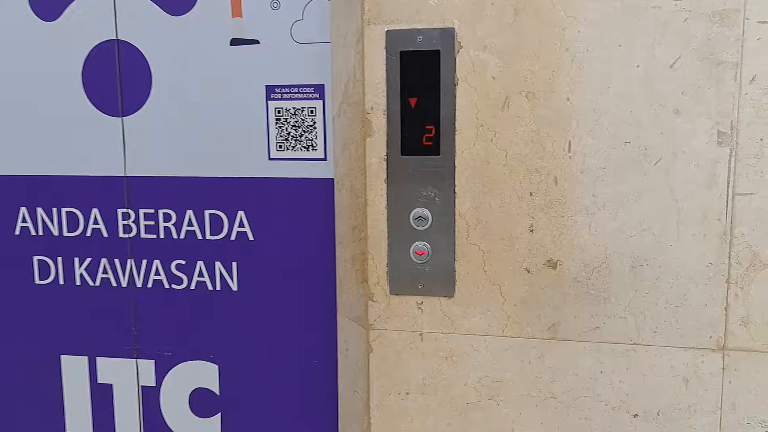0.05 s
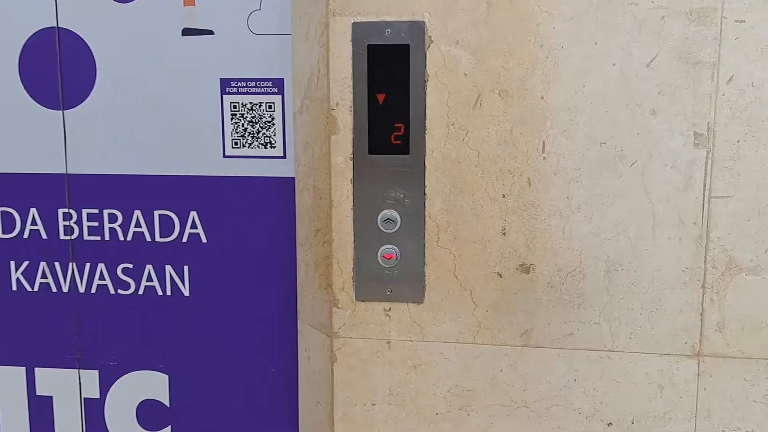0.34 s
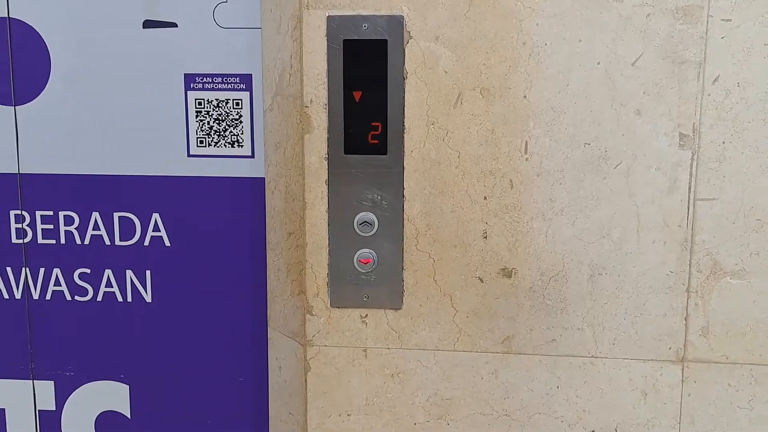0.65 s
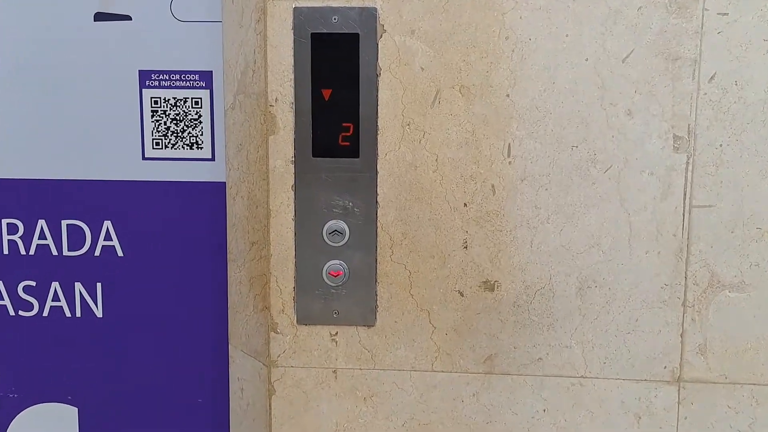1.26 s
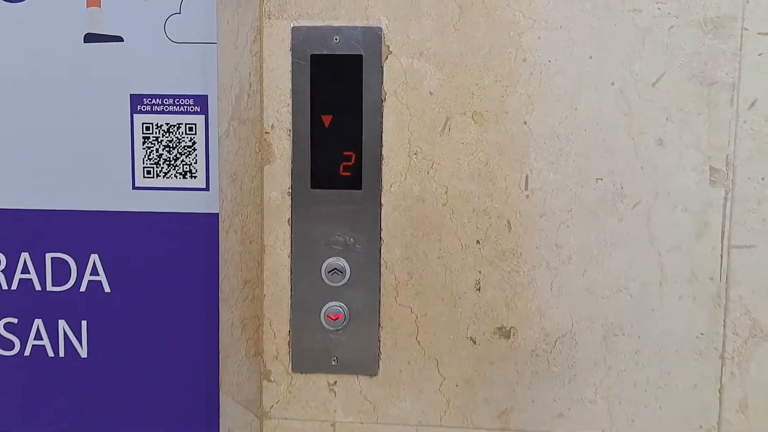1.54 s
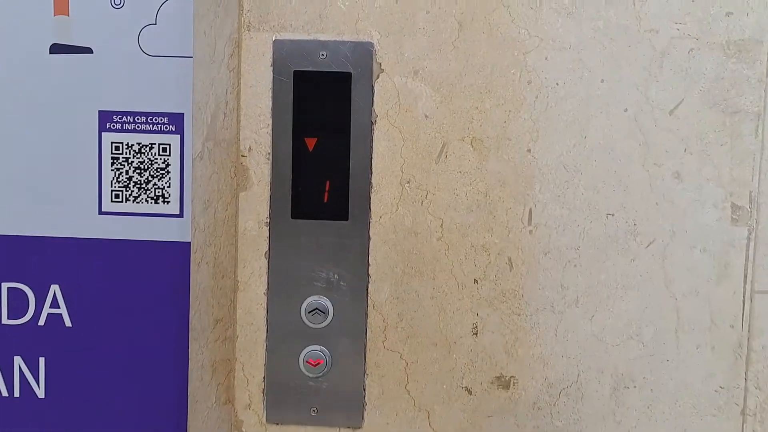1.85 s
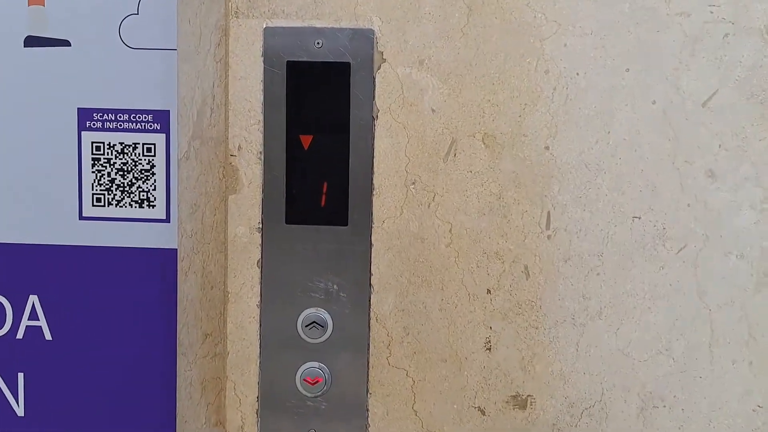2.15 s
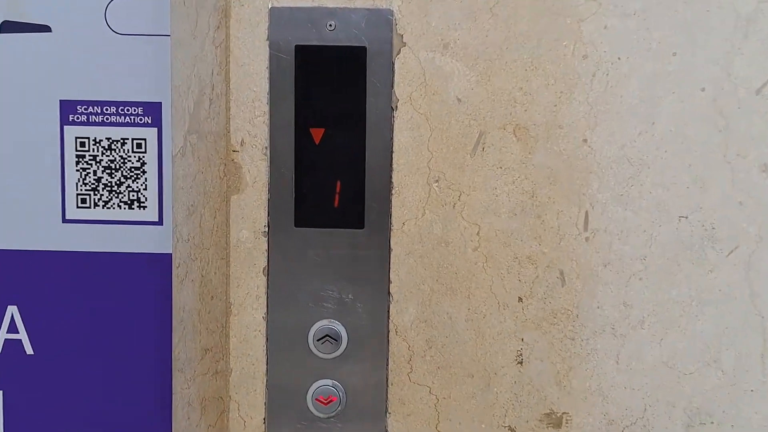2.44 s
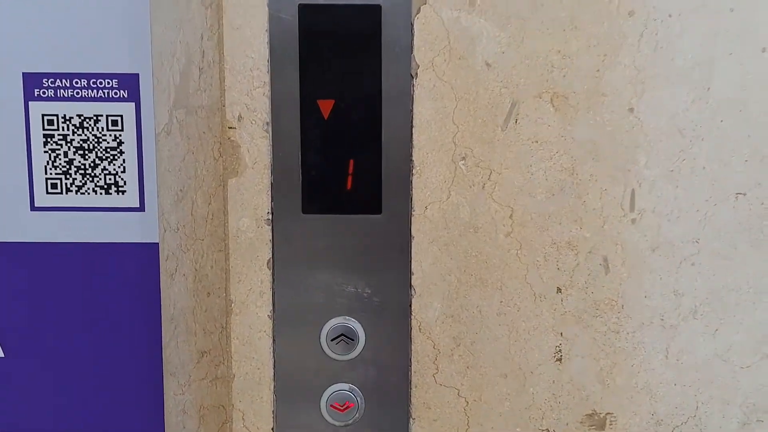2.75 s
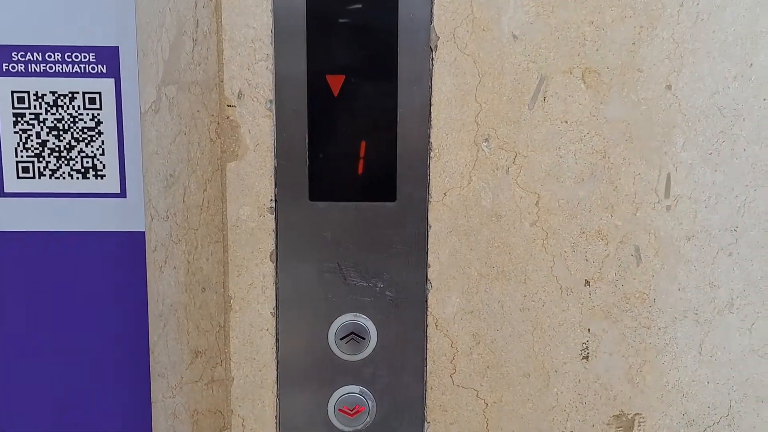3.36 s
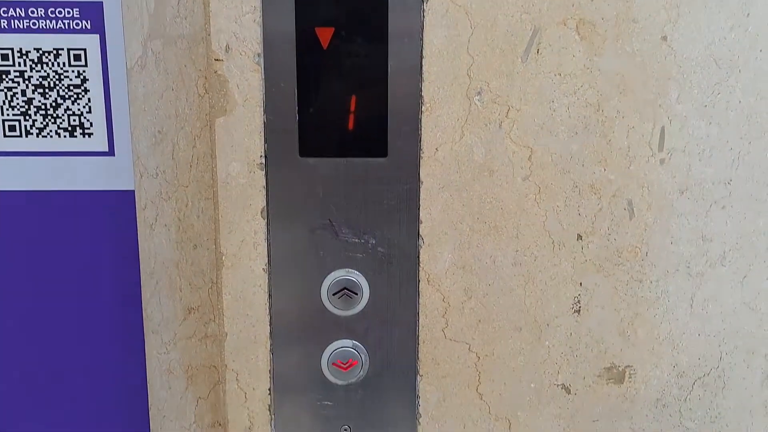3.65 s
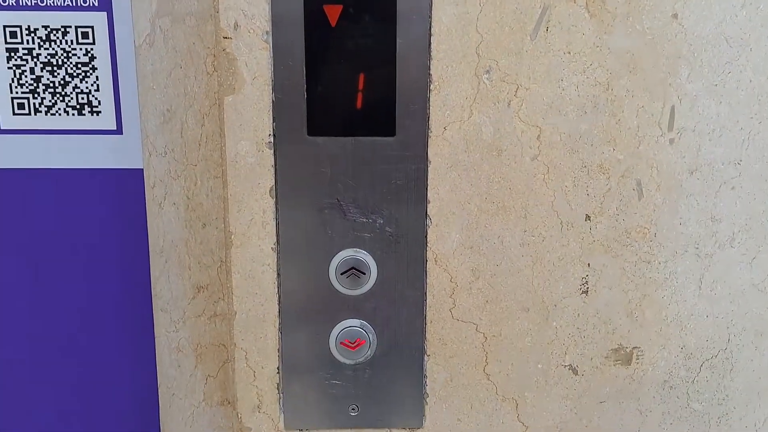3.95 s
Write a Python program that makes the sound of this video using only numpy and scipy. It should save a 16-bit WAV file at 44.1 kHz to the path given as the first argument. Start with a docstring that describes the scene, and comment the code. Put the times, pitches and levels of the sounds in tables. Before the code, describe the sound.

A low ventilation hum runs throughout an indoor hall. After a brief fading hiss, a moving elevator adds a whirr and an intermittent high whine, with faint distant scrapes and soft clothing rustles near the phone microphone.

```python
"""Ventilation rumbles and hums in a hall beside an elevator, heard from a handheld phone.
A hiss dies away at the start. A bearing whirrs with a quick throb, and rubbing metal gives a thin
whine that comes and goes as the car travels. There are a few faint far scrapes and, close to the
microphone, soft rustles of cloth and one tiny tick."""
import sys
import numpy as np
from scipy import signal
from scipy.fft import rfft, irfft
from scipy.io import wavfile

SR = 44100
rng = np.random.default_rng(int(sys.argv[2]) if len(sys.argv) > 2 else 0)


def generate_wav(signal):
    """Clip the signal to [-1, 1] and save it as 16-bit WAV at the path in sys.argv[1]."""
    frames = np.transpose(np.atleast_2d(signal))
    scaled = np.clip(frames, -1, 1) * 32767
    pcm = np.round(scaled).astype(np.int16)
    wavfile.write(sys.argv[1], SR, pcm)


N = 176400


def undb(db):
    """Decibels to gain."""
    return 10 ** (np.asarray(db) / 20)


def seconds():
    """Time of every sample."""
    return np.arange(N) / SR


def bins():
    """Bin frequencies, floored at 1 Hz."""
    return np.maximum(np.arange(N // 2 + 1) * SR / N, 1)


def over_pitch(points):
    """Join (f/Hz, value) points on a log-frequency axis."""
    hz, value = np.array(points, float).T
    return np.interp(np.log(bins()), np.log(hz), value)


def over_time(points):
    """Join (t/s, value) points."""
    return np.interp(seconds(), *np.array(points, float).T)


def lean(db):
    """Stereo gains for a left-minus-right level."""
    return undb(np.array([[1], [-1]]) * db / 2)


def walk(rate_hz):
    """Smooth random drift, unit spread."""
    drift = irfft(rfft(rng.standard_normal(N)) / (1 + (bins() / rate_hz) ** 4), N)
    return (drift - drift.mean()) / drift.std()


def swells(rows):
    """Bell-shaped envelopes, summed in power."""
    t = seconds()
    bells = (undb(db) * np.exp(-.5 * ((t - at_s) / sigma_s) ** 2) for at_s, sigma_s, db in rows)
    return np.sqrt(sum(bell ** 2 for bell in bells))


# Hall sound field: f/Hz, L-R correlation
CORRELATION = [(50, 1), (200, .93), (430, 0.79), (620, 0.25), (850, 0.43), (1500, -0.37), (2400, 0.17),
               (3200, -0.03)]

def diffuse(gain):
    """Reverberant stereo noise, alike in the bass, unrelated in the treble; gain per root Hz."""
    mid, side = rfft(rng.standard_normal((2, N))) * np.sqrt(SR / 2)
    correlation = over_pitch(CORRELATION)
    mid *= np.sqrt((1 + correlation) / 2)
    side *= np.sqrt((1 - correlation) / 2)
    return irfft(np.array([mid + side, mid - side]) * gain, N)


def resonance(hz, width_hz):
    """A resonance kept ringing by friction, unit rms."""
    ring = diffuse(1 / (1 + ((bins() - hz) / width_hz * 1.3) ** 2))
    return ring / ring.std()


# Air spectrum: f/Hz, density/(dB per Hz)
AIR_SPECTRUM = [(10, -84), (22, -72), (30, -66), (39, -59.5), (52, -55.5), (76, -58), (89, -76.5),
                (102, -60), (118, -60.5), (136, -58), (157, -63.5), (205, -64), (250, -67.5), (290, -66),
                (360, -71.5), (440, -72), (520, -76), (800, -81), (1300, -84.5), (1850, -84.5), (2100, -87),
                (2450, -86), (2900, -93.5), (3350, -90.5), (3800, -97.5), (5000, -97.5), (6200, -106.5),
                (7800, -105), (8700, -114.5), (12000, -113), (13500, -117), (15500, -119.5)]
# Air balance: f/Hz, L-R/dB
AIR_BALANCE = [(50, -2.5), (100, -0.4), (350, -1.5), (1200, -3.5), (2400, -7), (4200, -7), (6200, -7),
               (7700, -1), (9200, 4), (10500, 6.5), (13000, -0.5), (15500, -4)]
# Bass drift: t/s, level/dB
BASS_DRIFT = [(.15, -3), (1.1, -1), (1.8, -0.5), (2.3, -6.5), (2.9, 1.5), (4, 0)]
# Treble drift: t/s, level/dB
TREBLE_DRIFT = [(.15, 0.68), (.7, 0.21), (1.2, -0.12), (1.8, -0.64), (2.4, 1.6), (3.1, -1.8), (4, -1.6)]

def ventilation(bass_hz=101, treble_hz=2700, flicker_db=.9):
    """Duct rumble and flickering air noise; bass and treble drift as the listener moves."""
    air = diffuse(undb(over_pitch(AIR_SPECTRUM)) * lean(over_pitch(AIR_BALANCE)))
    bass = irfft(rfft(air) / (1 + (bins() / bass_hz) ** 4), N)
    treble = irfft(rfft(air) / (1 + (treble_hz / bins()) ** 4), N)
    body = air - bass - treble
    bass *= undb(over_time(BASS_DRIFT))
    body *= undb(flicker_db * walk(8.3))
    treble *= undb(over_time(TREBLE_DRIFT) + flicker_db * walk(6.8))
    return bass + body + treble


# Fan and motor tones: f/Hz, level/dB, wander/Hz
HUM_TONES = [(53.9, -47, 1.09), (102.7, -51, 0.88), (133.55, -52, 1.5), (398, -59, 1.54), (433, -62, 1.22),
             (590, -67.5, 1.05), (1556, -68, 1.77), (6059, -87, 5)]

def hum(waver_db=2.5):
    """Fans and motors, wavering in pitch and level."""
    out = 0
    for hz, db, wander_hz in HUM_TONES:
        turns = np.cumsum(hz + wander_hz * walk(2.78)) / SR + rng.random()
        out += np.sqrt(2) * np.sin(2 * np.pi * turns) * undb(db + waver_db * walk(1.8))
    return out * lean(db=-2.5)


# Scrapes: t/s, sigma/s, level/dB
SCRAPE_SWELLS = [(.68, 0.19, -57), (2.55, 0.062, -55), (2.94, .05, -58)]

def scrapes():
    """Far scrapes, blurred by the hall."""
    return resonance(hz=2400, width_hz=410) * swells(SCRAPE_SWELLS) * lean(db=-9.5)


# Cloth spectrum: f/Hz, density/(dB per Hz)
CLOTH_SPECTRUM = [(500, -135), (1500, -112), (3500, -99), (6000, -103), (7500, -103), (9000, -109),
                  (12000, -108), (15500, -114)]
# Brushes: t/s, sigma/s, level/dB
CLOTH_SWELLS = [(.86, 0.019, 1), (.91, .04, -5), (1.5, 0.061, -8), (1.917, 0.027, 1.5), (1.975, .045, -1.5),
                (2.345, 0.027, -0.5), (2.42, .045, 1)]

def rustles(grain_db=2):
    """Grainy brushes of cloth near the microphone."""
    balance = lean(over_pitch(AIR_BALANCE) / 2 + .5)
    cloth = diffuse(undb(over_pitch(CLOTH_SPECTRUM)) * balance)
    return cloth * swells(CLOTH_SWELLS) * undb(grain_db * walk(160))


def tick(at_s=2.8063, band_hz=(4300, 10000)):
    """One tiny dry tick on the left."""
    impulse = signal.unit_impulse(N, int(at_s * SR))
    band = signal.butter(2, band_hz, "band", fs=SR, output="sos")
    return signal.sosfilt(band, impulse + 1e-18) * undb(-38) * lean(db=14)


# Hiss spectrum: f/Hz, density/(dB per Hz)
HISS_SPECTRUM = [(150, -130), (350, -87), (700, -78.5), (1300, -85), (2200, -83.5), (3200, -84),
                 (4300, -93), (5800, -90), (7500, -100), (9000, -111), (12000, -112), (15500, -128)]

def hiss(hold_s=.27, fall_db_per_s=39):
    """A broad hiss holds briefly and dies away in the hall."""
    decay = undb(-fall_db_per_s * np.maximum(seconds() - hold_s, 0))
    balance = lean(over_pitch(AIR_BALANCE) - 1)
    return diffuse(undb(over_pitch(HISS_SPECTRUM)) * balance) * decay


# Bearing spectrum: f/Hz, density/(dB per Hz)
BEARING_SPECTRUM = [(1100, -160), (1350, -95), (1470, -83.5), (1580, -72), (1640, -71), (1730, -85),
                    (1900, -87), (2400, -160)]

def bearing(turn_hz=8.1, throb_db=1):
    """A narrow whirr that throbs once per turn."""
    throb = undb(throb_db * np.sin(2 * np.pi * turn_hz * seconds()))
    return diffuse(undb(over_pitch(BEARING_SPECTRUM))) * throb * lean(db=-4.5)


# Spells of rubbing: start/s, end/s, f/Hz, width/Hz, level/dB
WHINE_SPELLS = [(.1, .56, 5285, 70, -68.5), (.76, 1.4, 5425, 70, -64.5), (1.4, 1.64, 5400, 110, -76),
                (1.92, 2.5, 3186, 18, -67.5), (2.28, 2.9, 5285, 55, -65), (2.36, 3.04, 5405, 80, -69),
                (3.15, 3.28, 5370, 90, -68), (3.34, 3.72, 5420, 85, -65), (3.7, 4.05, 5415, 80, -66.5)]

def whine(rise_s=.057, fall_s=.13):
    """Rubbing metal sings thinly on the right, its faint octave on the left."""
    t, out = seconds(), 0
    for start_s, end_s, hz, width_hz, db in WHINE_SPELLS:
        rise = np.clip((t - start_s) / rise_s + .5, 0, 1)
        fall = np.clip((end_s - t) / fall_s + .5, 0, 1)
        tone = resonance(hz, width_hz) * lean(db=-7.8)
        octave = resonance(2 * hz, 2 * width_hz) * undb(-24.5) * lean(db=10)
        out += undb(db) * rise * fall * (tone + octave)
    return out


def scene():
    """Machinery in the hall and the small sounds nearby."""
    return ventilation() + hum() + scrapes() + rustles() + tick() + hiss() + bearing() + whine()


def record(dry):
    """The phone opens after a moment of silence and cuts the top."""
    start_s, ramp_s, top_hz = .1422, .0015, 15750
    opening = np.clip((seconds() - start_s) / ramp_s, 0, 1)
    lowpass = signal.ellip(10, .1, 80, top_hz, fs=SR, output="sos")
    return signal.sosfilt(lowpass, dry * opening)


dry = scene()
out = record(dry)
generate_wav(out)
```